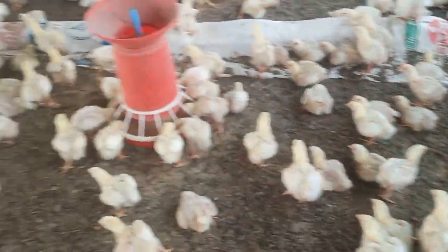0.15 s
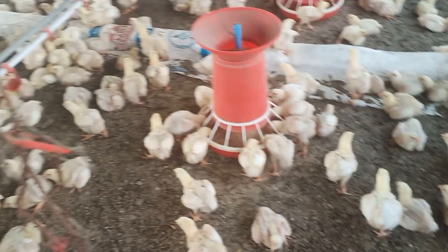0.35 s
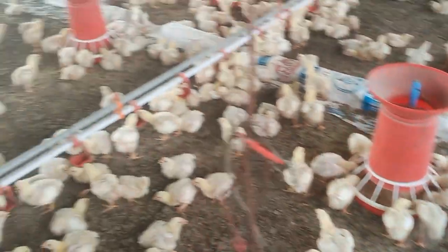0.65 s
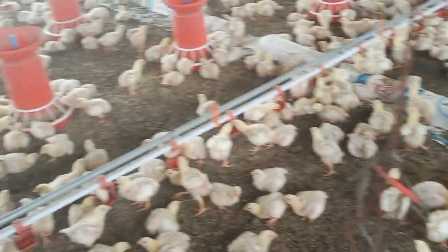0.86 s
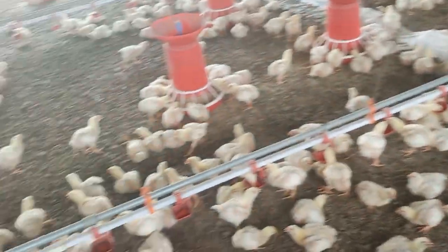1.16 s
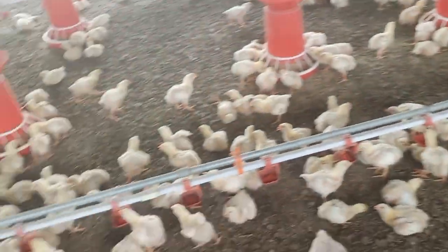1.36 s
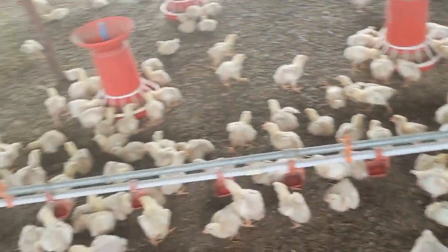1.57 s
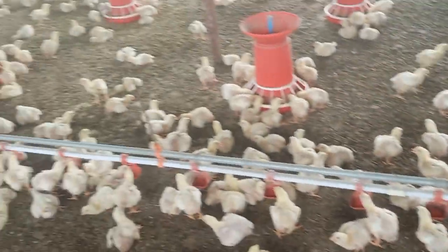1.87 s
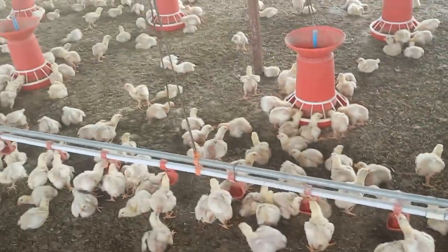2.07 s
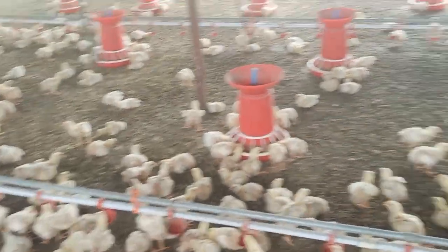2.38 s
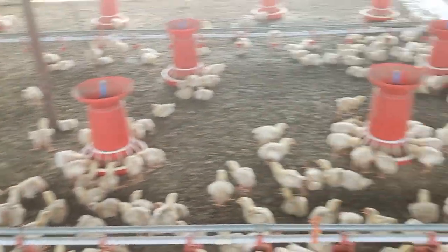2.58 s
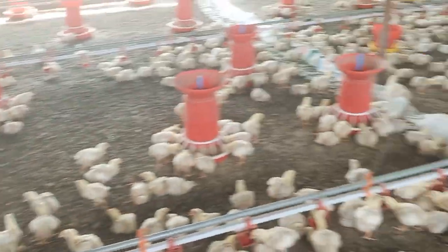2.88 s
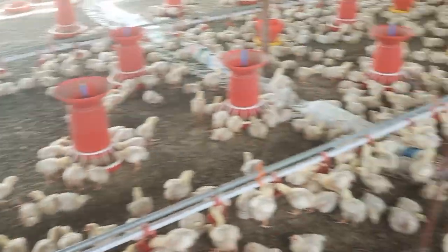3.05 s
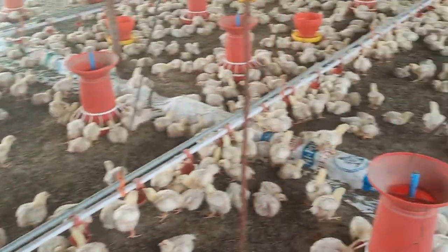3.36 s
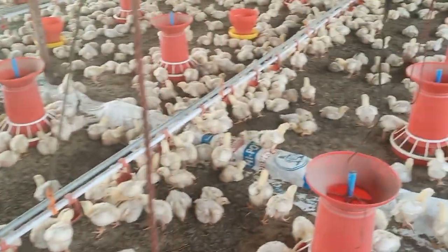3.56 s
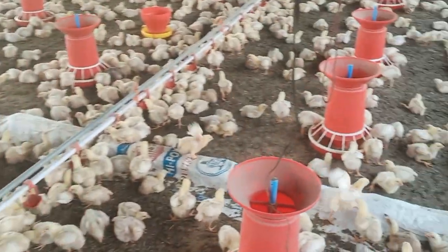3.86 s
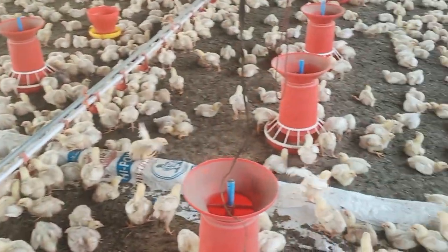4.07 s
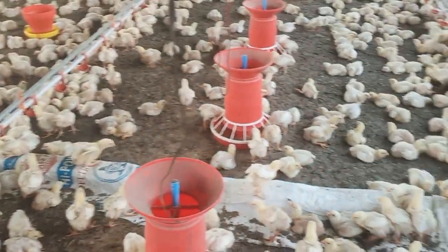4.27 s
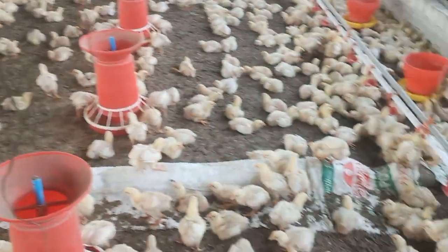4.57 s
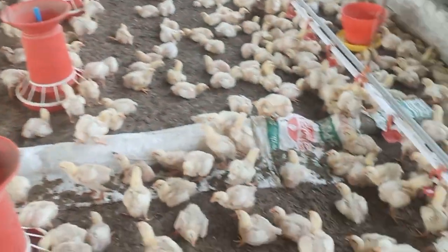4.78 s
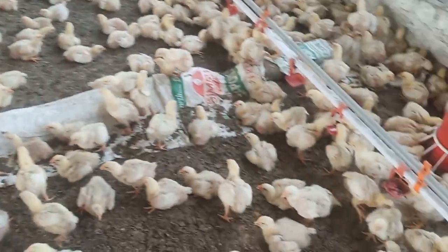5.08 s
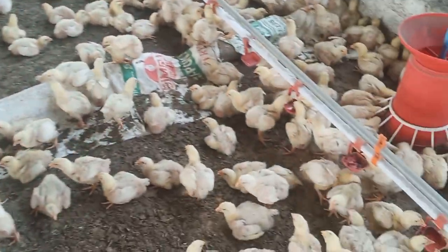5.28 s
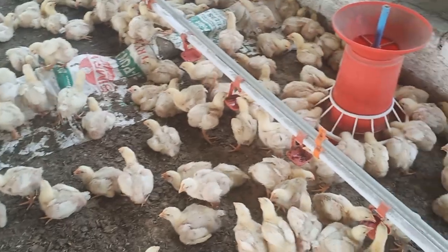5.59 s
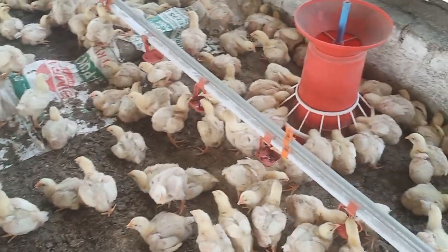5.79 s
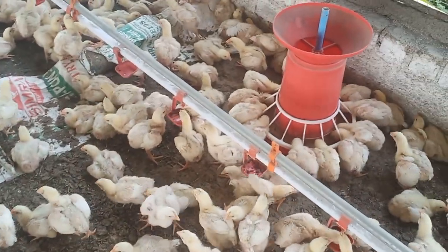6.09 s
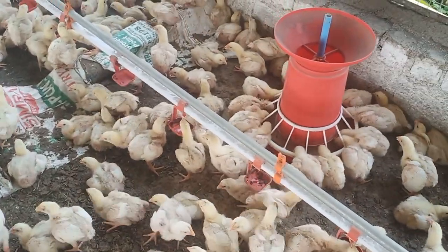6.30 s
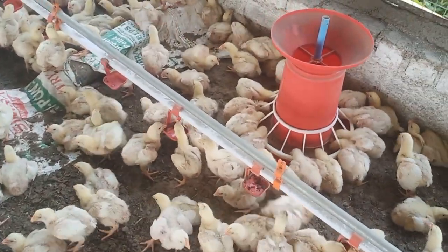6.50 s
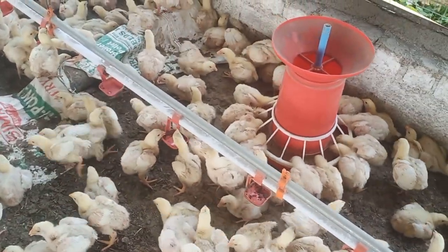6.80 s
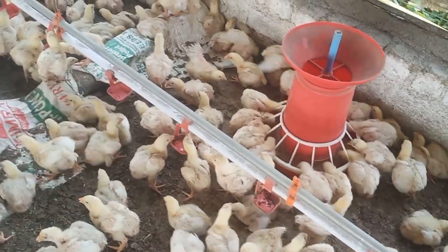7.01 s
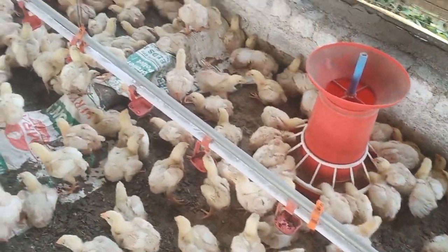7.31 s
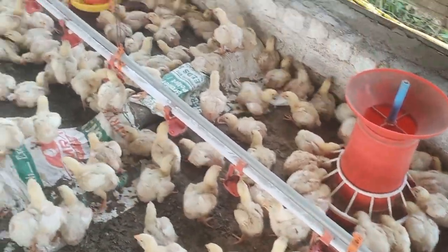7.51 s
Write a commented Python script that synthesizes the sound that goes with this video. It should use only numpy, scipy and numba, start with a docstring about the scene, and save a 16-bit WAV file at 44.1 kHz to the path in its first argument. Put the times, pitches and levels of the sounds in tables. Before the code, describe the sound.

A crowded flock of chicks cheeps without pause, nearest birds standing out sharply, over faint hiss, small beak ticks and low rustling.

```python
"""A long shed full of chicks, around a phone that pans slowly over them. The chorus opens loud and thins at once,
then runs on with brief hushes: thousands of falling sine peeps overlap with low chirrs and a few shrill calls,
and the nearest chicks stand out. Throughout, low noise swells and bright ticks of beaks on drinkers sound over a
flickering noise floor, with hiss and thin sine whine mostly left. Air rumbles and thuds left after 1.7 s, right
near 3 s; from about 4 s to 6 s the voices lean further left, then ease back a little."""
import sys
import numpy as np
from scipy import signal
from scipy.io import wavfile
from scipy.ndimage import uniform_filter1d
from numba import njit

SR = 44100
rng = np.random.default_rng(int(sys.argv[2]) if len(sys.argv) > 2 else 0)


def digitize_waveform(pressure):
    """Quantize a signal to 16-bit integers and store it at the path in sys.argv[1].

    Rows of a 2-D input are taken as channels; values are limited to [-1, 1].
    """
    field = np.atleast_2d(pressure).T
    bounded = np.clip(field, -1, 1)
    quanta = np.round(bounded * 32767).astype(np.int16)
    wavfile.write(sys.argv[1], SR, quanta)


N = 337320
T = np.arange(N) / SR


def undb(db):
    """Gain of a level in dB."""
    return 10 ** (np.asarray(db) / 20)


def level(x, db):
    """Bring x to an rms level in dB."""
    return x * undb(db) / np.sqrt(np.mean(x ** 2))


def sides(pan_db):
    """Left and right gains of constant total power, for a left minus right difference in dB."""
    left = 1 / (1 + undb(-2 * np.asarray(pan_db)))
    return np.sqrt(np.array([left, 1 - left]))


def band(x, lo_hz, hi_hz, order=2):
    """Keep the band between two frequencies."""
    return signal.sosfilt(signal.butter(order, [lo_hz, hi_hz], "bandpass", fs=SR, output="sos"), x)


def walk(rate, size=N):
    """Random levels held 1 / rate s and slewed twice; spread near 1."""
    hold = int(SR / rate)
    steps = np.repeat(rng.standard_normal(size // hold + 1), hold)
    return 2.07 * uniform_filter1d(uniform_filter1d(steps, hold), hold)[:size]


def patchy(points, lo_hz, count, per_octave, own_db, shared_db, rate, alike_hz):
    """Narrow noise bands that flicker together and alone; the ports grow more alike below alike_hz."""
    out = 0
    hz_at, db_at = np.transpose(points)
    half = 2 ** (.5 / per_octave)
    shared = shared_db * walk(rate)
    for hz in lo_hz * half ** (2 * np.arange(count)):
        mid, side = band(rng.standard_normal((2, N)), hz / half, hz * half, order=3)
        db = np.interp(np.log(hz), np.log(hz_at), db_at) + own_db * walk(rate) + shared
        width = min(hz / alike_hz, 1)
        out = out + undb(db) * (mid + width * side * np.array([[1], [-1]]))
    return level(out, 0)


@njit
def whistle(calls, gains, chance, size, shape, trill, overtone):
    """Each call is a near sine that glides with a small trill; it reaches the two ports out of step."""
    # calls: start s, length s, start Hz, end Hz, bend; chance: port step in cycles, trill rate, trill phase
    # shape: skew and sharpness of the swell; trill: lowest rate per s, pitch share, level share
    out = np.zeros((2, size))
    for c in range(len(calls)):
        start, n = int(calls[c, 0] * SR), int(calls[c, 1] * SR)
        phase, beat = 0., 2 * np.pi * (1 + chance[c, 1]) * trill[0] / SR
        for i in range(max(0, -start), min(n, size - start)):
            u = i / n
            shake = np.sin(beat * i + 2 * np.pi * chance[c, 2])
            hz = calls[c, 2] + (calls[c, 3] - calls[c, 2]) * u ** calls[c, 4]
            phase += 2 * np.pi * hz * (1 + trill[1] * shake) / SR
            swell = np.sqrt(2) * np.sin(np.pi * u ** shape[0]) ** shape[1] * (1 + trill[2] * shake)
            for ear in range(2):
                p = phase + ear * 2 * np.pi * chance[c, 0]
                out[ear, start + i] += gains[ear, c] * swell * (np.sin(p) + overtone * np.sin(2 * p))
    return out


# Colour of the hiss. Each row: frequency in Hz, relative level in dB per Hz.
HISS_COLOUR = [(9500, -17.5), (10500, -20.5), (11700, -1), (12800, -3), (14000, -7), (15200, 2.5)]
# Thin electronic tones. Each row: frequency in Hz, level in dB rms before panning and the port gain.
WHINE_TONES = [(8791, -87.5), (9873, -75.5), (12102, -87), (13184, -94.5), (14271, -76), (14330, -85.5),
               (14513, -91), (15353, -92.5), (15412, -91)]
PORT_GAIN = 2


def electronics():
    """Hiss and thin wavering tones, far stronger in the left port."""
    hiss = patchy(HISS_COLOUR, 9900, count=9, per_octave=12, own_db=1.5, shared_db=1.5, rate=14, alike_hz=100)
    hiss = hiss * undb(-72.5) * sides(13)[:, None]
    whine = 0
    for hz, db in WHINE_TONES:
        drift = 1.4 * np.array([walk(7.1), walk(3.0)])  # radians, one row a port
        loudness = np.sqrt(2) * undb(db + 2.0 * walk(70))
        whine = whine + loudness * np.sin(2 * np.pi * hz * T + drift)
    return (hiss + whine * sides(20)[:, None]) * PORT_GAIN


# Puffs of air on the ports. Each row: start in seconds, hold in seconds, level in dB, left minus right in dB.
AIR_PUFFS = [(1.734, 0.15, -47, 13), (1.925, 0.043, -61, 18), (2.056, 0.022, -62, 3),
             (2.864, 0.063, -53.5, 21), (2.965, 0.18, -41, -27), (3.227, 0.037, -57.5, 13),
             (4.421, 0.22, -60, 14), (5.81, 0.0093, -46.5, -1), (7.215, 0.042, -65, -0.5)]
PUFF_RISE_DB_PER_S, PUFF_FADE_DB_PER_S = 895, 398.5


def puffs():
    """Turbulent air at the ports: a rough low rumble that sets in fast, holds and fades."""
    common, own = rng.standard_normal(N), rng.standard_normal((2, N))
    low_noise = band(band(common + .8 * own, 70, 230), 55, 450)
    rumble = level(low_noise * undb(2.5 * walk(60)), 0)
    gain = 0
    for s, hold, db, pan_db in AIR_PUFFS:
        rise_db = PUFF_RISE_DB_PER_S * np.maximum(s - T, 0)
        fade_db = PUFF_FADE_DB_PER_S * np.maximum(T - s - hold, 0)
        gain = gain + undb(db - rise_db - fade_db) * sides(pan_db)[:, None]
    return rumble * gain


# Single eddies that buffet mostly one port. Each row: start in seconds, level in dB, left minus right in dB.
EDDIES = [(1.721, -31.5, 7), (1.747, -32, 5), (1.763, -33, 10), (1.796, -35.5, 14), (1.867, -29, 10),
          (2.946, -35, -20), (2.969, -28, -25), (2.983, -33, -27), (3.014, -45, -27), (3.055, -32.5, -29),
          (3.084, -27.5, -30), (3.117, -29, -21), (3.154, -42, -26)]
EDDY_HZ, EDDY_RISE_S = 139, 0.0043


def eddies():
    """Each eddy thuds on a port: a short low sine that swells and dies, its pitch a little random."""
    out, t = np.zeros((2, N)), np.arange(SR // 10) / SR
    swell = t / EDDY_RISE_S * np.exp(1 - t / EDDY_RISE_S)
    for (s, db, pan_db), chance in zip(EDDIES, rng.standard_normal(len(EDDIES))):
        thud = np.sin(2 * np.pi * EDDY_HZ * (1 + 0.16 * chance) * t) * swell
        out[:, int(s * SR):][:, :len(t)] += undb(db) * sides(pan_db)[:, None] * thud
    return out


def air():
    """All the air at the ports, trimmed to its low band."""
    return band(puffs() + eddies(), 60, 700)


# Colour of the low noise floor. Each row: frequency in Hz, relative level in dB per Hz.
LOW_FLOOR_COLOUR = [(24, -42), (40, -9.5), (123, -2.5), (230, -8), (338, -4.5), (550, -3), (869, -7.5),
                    (1100, 8.5), (1430, -30), (2420, -120)]
# Colour of the high noise floor. Each row: frequency in Hz, relative level in dB per Hz.
HIGH_FLOOR_COLOUR = [(3600, 4.5), (4400, -26.5), (5200, -11.5), (6200, -22), (7200, -27.5), (9000, -35)]


def patchy_floor():
    """Low patchy noise floor that flickers in narrow bands, and a high one that leans left."""
    low = patchy(LOW_FLOOR_COLOUR, 42, count=24, per_octave=5, own_db=3.2, shared_db=1.6, rate=13, alike_hz=3000)
    high = patchy(HIGH_FLOOR_COLOUR, 3700, count=10, per_octave=7, own_db=4, shared_db=1.5, rate=30, alike_hz=100)
    return low * undb(-60.5) + high * undb(-58.5) * sides(8.1)[:, None]


# Short swells of low noise. Each row: start in seconds, relative level in dB, colour in Hz.
NOISE_SWELLS = [(0.027, -33, 740), (0.227, -39.5, 332), (0.689, -35, 820), (0.732, -36.5, 330),
                (1.053, -39.5, 720), (1.157, -33.5, 432), (1.862, -46, 573), (1.89, -39, 544),
                (1.935, -44, 560), (2.056, -39.5, 576), (2.27, -39.5, 640), (2.398, -41, 583),
                (2.577, -41, 940), (2.75, -41, 557), (2.902, -34.5, 514), (2.974, -31.5, 303),
                (3.062, -45, 245), (3.4, -49.5, 690), (3.606, -42.5, 700), (3.666, -37.5, 315),
                (3.718, -36.5, 627), (3.872, -36, 263), (3.96, -35.5, 850), (4.031, -36, 785),
                (4.206, -35.5, 390), (4.402, -39, 966), (4.565, -38, 754), (4.61, -43, 390),
                (4.934, -30, 916), (4.968, -39.5, 403), (5.07, -35.5, 980), (5.18, -32.5, 960),
                (5.409, -50, 317), (5.526, -44.5, 240), (5.745, -35.5, 770), (5.821, -33.5, 605),
                (5.832, -38.5, 299), (6, -45, 347), (6.13, -41.5, 634), (6.168, -41.5, 347),
                (6.19, -29.5, 776), (6.24, -41, 393), (6.245, -36, 910), (6.724, -28, 590),
                (6.745, -47, 310), (6.836, -40, 332), (6.899, -39, 472), (6.915, -46, 318),
                (7.037, -36.5, 586), (7.08, -47, 420), (7.551, -46.5, 344)]
SWELL_RISE_S, SWELL_TRIM_DB = .021, -11.5
SWELL_SKIRT_DB = -5  # broad grit around the colour of a swell


def noise_swells():
    """Short swells of low gritty noise, each with its own colour."""
    out, t = np.zeros((2, N + SR)), np.arange(SR // 4) / SR
    swell = (t / SWELL_RISE_S * np.exp(1 - t / SWELL_RISE_S)) ** 2
    swell = sides(-1)[:, None] * swell
    for s, db, hz in NOISE_SWELLS:
        common, own = rng.standard_normal(len(t)), rng.standard_normal((2, len(t)))
        noise = common + 0.53 * own
        core = level(band(noise, hz / 1.182, hz * 1.173), 0)
        skirt = level(band(noise, hz / 2, hz * 2.1), SWELL_SKIRT_DB)
        out[:, int(s * SR):][:, :len(t)] += (core + skirt) * undb(db + SWELL_TRIM_DB) * swell
    return out[:, :N]


# Beaks on drinkers and feeders. Each row: start in seconds, relative level in dB.
BEAK_TICKS = [(.391, -82), (.7098, -64), (.841, -59), (1.6282, -60), (1.894, -59), (2.1101, -56),
              (2.2374, -66), (2.352, -59), (2.5775, -66.5), (2.676, -62.5), (2.7866, -63), (3.1425, -57),
              (3.285, -55), (3.6316, -60), (3.821, -61.5), (3.914, -54.5), (4.447, -63), (5.3, -61),
              (5.3911, -62), (5.738, -52.5), (6.208, -54), (6.3215, -64), (6.4408, -66), (6.526, -59),
              (6.7231, -62), (6.9675, -56), (7.0664, -57)]
FAINT_TICK_DB, TICK_TRIM_DB, TICK_PAN_DB = -66, 7.0, 14.5
TICK_RATTLE = 0.62  # usual share of rattle against click


def ticks():
    """A click, then a gritty rattle of the drinker, bright through the port's high resonance; faint ones between."""
    out, t = np.zeros((2, N + SR)), np.arange(SR // 8) / SR
    faint = [(s * N / SR, FAINT_TICK_DB + 8.0 * (size - .5)) for s, size in rng.random((35, 2))]
    for s, db in BEAK_TICKS + faint:
        share = np.clip(TICK_RATTLE + .15 * rng.standard_normal(), 0, 1)
        slow = 0.011 * (0.53 + rng.random())  # rise of the rattle in s
        click = t / 0.003 * np.exp(1 - t / .002)
        rattle = t / slow * np.exp(1 - t / slow)
        shape = (1 - share) * click + share * rattle
        flicker = undb(4.6 * walk(300, size=len(t)))
        grit = band(rng.standard_normal((2, len(t))) * shape * flicker, 10800, 14500)
        out[:, int(s * SR):][:, :len(t)] += undb(db + TICK_TRIM_DB) * sides(TICK_PAN_DB)[:, None] * grit
    return out[:, :N]


# The phone swings round. Each row: time in seconds, left minus right in dB.
PHONE_TURN = [(0.0, 7.5), (1.4, 6.5), (1.64, 7), (2.83, 7), (3.24, 6), (3.75, 7), (6.05, 11), (7.65, 9)]
LEAN_DB_PER_OCTAVE, LEFT_PEAK_HZ = 15, 3200  # the left port favours pitches near this one


def pan_of(s, hz):
    """Left minus right dB of a call: where the phone points, and the colour of the left port."""
    octaves_off = np.minimum(abs(np.log2(hz / LEFT_PEAK_HZ)), 1.05)
    return np.interp(s, *np.transpose(PHONE_TURN)) + LEAN_DB_PER_OCTAVE * (.3 - octaves_off)


# Loudness of the flock. Each row: time in seconds, level of all voices in dB, extra level of low chirrs in dB.
FLOCK_LOUDNESS = [(0, -21.5, 4), (.2, -30, 0.5), (.75, -32, 4.5), (1.2, -30.5, -4.5), (1.5, -32.5, 0),
                  (1.9, -31.5, 1), (2.25, -31, -4), (2.6, -32.5, -6.5), (3.1, -30.5, -3), (3.4, -29, -2),
                  (3.85, -29.5, 2.5), (4.35, -30.5, 1.5), (4.9, -31, 1), (5.7, -29.5, -0.5), (6.2, -31, 2),
                  (6.7, -28, -1), (7.1, -31, 6), (7.35, -29.5, -4), (7.65, -32, -5)]
# Brief hushes of the flock. Each row: middle in seconds, half width in seconds, depth in dB before a voice's share.
HUSHES = [(.07, 0.038, 8.5), (0.459, 0.034, 11.5), (1.098, 0.02, 7), (1.479, 0.068, 6),
          (2.019, 0.058, 11.5), (2.342, 0.063, 13), (2.811, 0.067, 7.5), (3.482, 0.11, 9.5),
          (3.699, 0.076, 11.5), (4.149, 0.076, 1.5), (4.469, 0.041, 4), (4.86, 0.099, 4.5), (5.45, 0.14, 4),
          (6.302, 0.02, 12), (7.179, 0.042, 5.5), (7.39, 0.015, 0.5)]
# Peeps, low chirrs, shrill calls, deep peeps. Each row: calls a second, middle pitch in Hz, pitch spread as a share,
# typical fall as a share, typical length in seconds, gain in dB, share of a hush, own waver in dB.
FLOCK_VOICES = [(349.6, 2561, .118, 0.1637, 0.034, -0.52, 0.57, 1.06),
                (99.3, 1320, 0.075, .086, 0.034, -16.5, 1.6, 2.2),
                (130, 4050, .095, 0.046, 0.045, -29, 3, 1.2), (87, 1780, 0.065, 0.16, 0.041, -24, 0.93, 2)]
CHIRR_BELOW_HZ, WAVERS_PER_S = 1500, 6.5
SPAN_S, MOST_CALLS = 8, 4000


def flock():
    """Four kinds of voice scattered in time, pitch, distance and direction; a peep holds, then drops."""
    times, all_db, low_db = np.transpose(FLOCK_LOUDNESS)
    loud_db, chirr_db = np.interp(T, times, all_db), np.interp(T, times, low_db)
    hush_db = sum(depth_db * np.exp(-((T - s) / half) ** 2) for s, half, depth_db in HUSHES)
    out = 0
    for rate, hz, spread, fall, length, gain_db, hush, waver_db in FLOCK_VOICES:
        count = int(rate * SPAN_S)
        even = rng.random((MOST_CALLS, 5))[:count]
        bell = rng.standard_normal((MOST_CALLS, 5))[:count]
        middle = hz * np.exp(spread * np.clip(bell[:, 0], -2, 1.7))
        drop = fall * np.exp(0.7234 * np.clip(bell[:, 1], -2, 1.0))
        start = SPAN_S * even[:, 0] - .01
        lengths = length * np.exp(.35 * bell[:, 2])
        bend = 1 + even[:, 4]
        calls = np.c_[start, lengths, middle * (1 + .4 * drop), middle * (1 - .6 * drop), bend]
        gains = undb(3 * bell[:, 3]) * sides(pan_of(start, middle) + 4.9 * bell[:, 4])
        shape, trill = np.array([.8, 1.6]), np.array([40, .013, .3])
        crowd = whistle(calls, gains, even[:, 1:4].copy(), N, shape, trill, undb(-52.5))
        swing_db = loud_db + chirr_db * (hz < CHIRR_BELOW_HZ) - hush * hush_db + waver_db * walk(WAVERS_PER_S)
        out = out + level(crowd, gain_db) * undb(swing_db)
    return out


# Calls of the nearest chicks. Each row: start in seconds, length in seconds, start pitch in Hz, end pitch in Hz,
# level in dB, left minus right in dB.
NEAR_CALLS = [(0.009, 0.028, 1850, 1750, -36.5, 5), (0.048, 0.063, 2130, 1780, -33, 1.5),
              (0.14, 0.096, 1180, 1312, -37, -2.5), (0.142, 0.029, 1710, 1700, -40.5, -20),
              (0.152, 0.033, 2190, 1940, -19, 3), (0.167, 0.13, 2430, 1720, -32, -12),
              (0.183, 0.076, 3950, 3780, -50, 9), (0.186, 0.033, 2630, 2680, -33.5, 5),
              (0.202, 0.041, 2080, 1740, -28, -8), (0.287, 0.067, 1440, 1346, -34, -7),
              (0.371, 0.036, 1357, 1356, -36, -3), (0.375, 0.024, 3500, 3330, -37, 16),
              (0.4, 0.039, 2630, 2380, -26, 10), (0.439, 0.096, 3020, 2454, -25.5, 2.5),
              (0.481, 0.028, 2150, 1470, -26, -16), (0.497, 0.047, 2194, 1946, -23.5, 4.5),
              (0.551, 0.053, 1379, 1320, -36, 0.5), (0.586, 0.033, 2414, 2460, -21.5, 8),
              (0.587, 0.069, 1384, 1017, -33, 4), (0.607, 0.071, 1535, 1670, -38, -9),
              (0.682, 0.082, 1092, 1210, -34, 1), (0.733, 0.1, 3540, 2590, -39.5, 3),
              (0.739, 0.033, 3950, 3800, -54, -5), (0.74, 0.032, 2530, 2750, -21, 5),
              (0.75, 0.012, 1374, 1360, -26.5, -3), (0.753, 0.04, 2150, 2300, -29, 2),
              (0.763, 0.042, 1970, 1830, -29, -8), (0.798, 0.05, 2340, 1354, -26.5, -5),
              (0.836, 0.054, 1960, 1940, -33, -8), (0.849, 0.094, 2120, 1990, -37.5, 4),
              (0.948, 0.068, 1316, 1434, -34.5, 1), (0.984, 0.067, 4070, 4000, -50.5, 8),
              (0.985, 0.031, 1670, 1770, -37, -7), (1.114, 0.053, 5230, 5100, -58, 14),
              (1.161, 0.041, 1800, 1550, -26, -7), (1.209, 0.022, 3550, 3440, -47, 0),
              (1.214, 0.024, 1730, 1690, -36, -11), (1.233, 0.03, 2220, 2065, -23, 5),
              (1.311, 0.035, 1430, 1410, -34.5, -5), (1.643, 0.068, 2010, 1950, -30.5, 4),
              (1.667, 0.081, 3040, 2710, -28, 8), (1.694, 0.038, 2044, 2044, -25, 7),
              (1.77, 0.04, 714, 700, -45.5, -5), (1.771, 0.034, 2324, 2010, -29.5, -10),
              (1.81, 0.098, 1710, 1820, -41.5, -4), (1.888, 0.029, 5420, 5430, -54, 18),
              (2.058, 0.033, 1467, 1364, -34, -6), (2.135, 0.042, 3200, 2930, -32, 15),
              (2.145, 0.026, 2320, 2070, -26, 0), (2.142, 0.03, 3970, 3720, -41, 8),
              (2.22, 0.055, 2310, 1957, -24.5, -1), (2.532, 0.039, 3110, 2820, -28, 11),
              (2.562, 0.067, 2485, 2170, -22, 4), (2.572, 0.037, 3720, 3290, -45, 15),
              (2.614, 0.049, 2870, 2700, -22.5, 7), (2.661, 0.042, 3300, 3000, -27.5, 11),
              (2.679, 0.025, 1900, 2000, -34.5, -16), (2.685, 0.028, 2680, 2305, -16.5, -1.5),
              (2.882, 0.061, 2420, 2170, -29, 3), (2.946, 0.043, 1920, 1730, -34.5, -2),
              (2.95, 0.027, 3120, 2760, -24.5, 9), (2.993, 0.082, 3270, 3120, -33, 10),
              (3.032, 0.039, 2850, 2340, -29, 5), (3.117, 0.056, 3400, 3330, -33, 14),
              (3.175, 0.021, 1446, 1330, -30.5, -4.5), (3.175, 0.092, 3217, 2306, -22.5, 16),
              (3.207, 0.027, 2230, 1760, -24.5, -0.5), (3.208, 0.036, 700, 700, -48, 2),
              (3.236, 0.027, 2410, 2350, -28.5, 15), (3.239, 0.075, 4600, 4680, -56.5, 20),
              (3.252, 0.07, 722, 726, -54.5, 0), (3.29, 0.088, 3504, 3130, -29, 16),
              (3.299, 0.094, 2820, 1910, -36, 7), (3.306, 0.094, 732, 710, -60, 8),
              (3.391, 0.05, 3270, 3170, -27.5, 15), (3.412, 0.03, 3100, 2530, -32, 6),
              (3.428, 0.032, 2650, 2324, -21.5, 6), (3.613, 0.026, 2405, 2380, -28, 2),
              (3.797, 0.054, 2590, 2550, -27.5, -1), (3.834, 0.041, 3800, 3760, -44.5, -1),
              (3.878, 0.035, 1890, 1820, -38.5, -1), (3.933, 0.052, 2900, 2700, -26, 5),
              (3.995, 0.067, 1810, 1345, -36, -10), (4.327, 0.051, 1480, 1274, -35, -13),
              (4.329, 0.038, 2200, 1690, -25.5, -9), (4.341, 0.049, 3620, 3720, -41.5, 13),
              (4.353, 0.074, 2420, 2260, -27.5, 8), (4.36, 0.052, 4840, 4900, -51.5, 18),
              (4.453, 0.079, 2520, 2000, -37.5, -10), (4.462, 0.052, 3050, 2630, -28, 15),
              (4.49, 0.021, 2574, 2290, -21.5, 10), (4.506, 0.064, 5380, 4970, -53, 16),
              (4.526, 0.063, 4130, 3600, -36.5, 6), (4.551, 0.034, 2265, 1750, -33, 5),
              (4.559, 0.058, 5220, 5180, -54, 20), (4.629, 0.022, 1790, 1610, -37, -8),
              (4.729, 0.063, 3630, 3570, -40.5, 12), (4.753, 0.064, 2300, 2200, -29, -8),
              (4.764, 0.044, 4500, 4400, -40, 4), (4.765, 0.076, 3380, 3230, -35.5, 17),
              (4.772, 0.041, 5400, 5370, -59.5, 13), (4.873, 0.041, 2665, 2370, -21, 9),
              (4.899, 0.049, 4120, 4060, -42, 7), (4.914, 0.03, 1030, 945, -46, -3),
              (4.931, 0.095, 3150, 2800, -29, 16), (4.952, 0.098, 1021, 920, -40.5, -1),
              (4.985, 0.02, 4730, 4700, -54, 13), (5.014, 0.021, 2595, 2560, -20.5, 8),
              (5.041, 0.096, 949, 880, -37.5, -4), (5.067, 0.066, 2503, 2232, -26.5, -7),
              (5.156, 0.074, 1990, 1630, -40, -14), (5.165, 0.042, 1310, 1287, -31.5, -3),
              (5.23, 0.071, 2560, 2260, -26, 3), (5.277, 0.035, 1204, 1170, -33, 6),
              (5.278, 0.059, 3240, 2940, -29, 12), (5.303, 0.096, 2360, 1876, -41, -1),
              (5.369, 0.026, 1420, 1360, -34.5, 1), (5.485, 0.099, 2900, 2580, -30, 5),
              (5.576, 0.056, 2400, 2117, -30, -1), (5.588, 0.037, 1435, 1360, -27, -11),
              (5.637, 0.088, 3137, 2930, -28.5, 19), (5.656, 0.1, 1297, 1130, -37.5, -2),
              (5.726, 0.033, 842, 877, -44, 3), (5.744, 0.06, 1320, 1365, -39.5, -2),
              (5.798, 0.1, 2990, 2550, -30, 9), (5.836, 0.062, 4070, 3070, -46.5, 10),
              (5.87, 0.026, 2767, 2820, -31, 18), (5.892, 0.07, 1476, 1390, -34, -21),
              (5.969, 0.07, 3140, 2650, -26.5, 13), (6.03, 0.11, 2530, 2003, -24.5, 6),
              (6.031, 0.11, 1472, 1284, -30.5, -6), (6.057, 0.04, 1920, 1910, -34.5, -6),
              (6.099, 0.056, 4000, 3980, -47.5, 4), (6.12, 0.025, 3630, 3750, -44.5, 21),
              (6.178, 0.07, 2546, 1650, -32, 0), (6.208, 0.02, 1640, 1530, -33.5, -15),
              (6.283, 0.082, 3136, 2660, -26, 17), (6.366, 0.076, 3160, 3040, -31, 24),
              (6.377, 0.035, 716, 696, -41.5, 3), (6.382, 0.059, 3550, 3490, -39, 10),
              (6.409, 0.026, 2390, 2390, -32, 2), (6.44, 0.023, 2880, 2710, -22, 13.5),
              (6.442, 0.03, 3320, 3070, -34, 13), (6.471, 0.066, 2460, 2050, -30, 2),
              (6.485, 0.037, 3070, 2700, -26, 11), (6.522, 0.031, 2016, 1890, -38, -1),
              (6.552, 0.074, 3100, 2820, -23.5, 22), (6.565, 0.022, 2740, 2560, -23, 13),
              (6.565, 0.068, 3760, 3950, -46, 12), (6.603, 0.076, 3330, 2880, -31, 15),
              (6.618, 0.08, 5010, 4910, -55, 5), (6.658, 0.052, 2070, 1980, -33.5, -5),
              (6.662, 0.06, 2555, 2400, -26, -4), (6.676, 0.069, 1260, 940, -39.5, -3),
              (6.677, 0.043, 3110, 3040, -39, 17.5), (6.724, 0.053, 1870, 1550, -34, -8),
              (6.735, 0.051, 2730, 2370, -26.5, 12), (6.748, 0.025, 2930, 2860, -24, 19.5),
              (6.789, 0.12, 2987, 3070, -31.5, 10), (6.792, 0.068, 3690, 3530, -40.5, 8),
              (6.812, 0.085, 2397, 2150, -27.5, -3), (6.823, 0.048, 4060, 3980, -47.5, 6),
              (6.848, 0.04, 5330, 5260, -55, 17), (6.91, 0.042, 2750, 2797, -23.5, 15),
              (6.93, 0.041, 2540, 2320, -23, -1), (6.947, 0.058, 3550, 3480, -41, 11),
              (6.955, 0.023, 3870, 4050, -35.5, 2), (7.025, 0.034, 1433, 1280, -31.5, 5),
              (7.048, 0.12, 2346, 2070, -28, -1), (7.075, 0.059, 5410, 5490, -57.5, 14),
              (7.152, 0.038, 3570, 3350, -43.5, 11), (7.181, 0.05, 3390, 3260, -37, 13),
              (7.212, 0.035, 4010, 3760, -33.5, 2), (7.213, 0.034, 3020, 2760, -27, 15),
              (7.253, 0.12, 2716, 2500, -23.5, 5.5), (7.255, 0.027, 3580, 3560, -40.5, 16),
              (7.263, 0.11, 4050, 4040, -51.5, 10), (7.279, 0.031, 2410, 2260, -20.5, 7),
              (7.28, 0.035, 3100, 2840, -24, 15), (7.286, 0.063, 3220, 3540, -34, 12),
              (7.313, 0.02, 1980, 1880, -29, -10), (7.318, 0.038, 1654, 1320, -33, -3),
              (7.33, 0.016, 2803, 2550, -19.5, 10), (7.335, 0.077, 2290, 2320, -36, 0),
              (7.398, 0.073, 1454, 1364, -33.5, -8.5), (7.399, 0.016, 1870, 1890, -39, -15),
              (7.48, 0.083, 3020, 2556, -25.5, 14), (7.482, 0.055, 1470, 1440, -31.5, -10),
              (7.503, 0.051, 3480, 2740, -34, 18), (7.536, 0.031, 5870, 5800, -56.5, 16),
              (7.541, 0.041, 1417, 1426, -37, 0), (7.55, 0.035, 3820, 3770, -36.5, 6),
              (7.58, 0.034, 1408, 1245, -32, 4.5), (7.623, 0.015, 2750, 2590, -24, 9)]
NEAR_BEND = 1.8  # above 1 a call holds its pitch, then glides
SHRILL_ABOVE_HZ = 3500


def near_chicks():
    """The calls that stand out of the chorus: slightly trembling glides; the shrill ones warble roughly."""
    rows = np.array(NEAR_CALLS, float)
    chance = rng.random((len(rows), 4))
    port_step = np.sign(chance[:, 3] - .5) * (.13 + .24 * chance[:, 0])  # cycles
    steps = np.c_[port_step, chance[:, 1:3]]
    gains = undb(rows[:, 4]) * sides(rows[:, 5])
    calls = np.c_[rows[:, :4], np.full(len(rows), NEAR_BEND)]
    shrill = rows[:, 2] > SHRILL_ABOVE_HZ
    shape = np.array([.9, .8])
    tremble, warble = np.array([40, .004, .18]), np.array([55, .018, .65])
    plain_calls = whistle(calls, gains * ~shrill, steps, N, shape, tremble, undb(-46))
    shrill_calls = whistle(calls, gains * shrill, steps, N, shape, warble, undb(-46))
    return plain_calls + shrill_calls


SHED_T60_S = .22
FLOCK_WET_DB, NEAR_WET_DB = -3, -11


def shed(x, wet_db):
    """Floor, roof and walls return a short diffuse tail, more of it to the right port."""
    t = np.arange(int(SR / 2)) / SR
    tail = rng.standard_normal((2, len(t))) * 1000. ** (-t / SHED_T60_S) * (t > .004)
    tail = tail / np.sqrt(np.sum(tail ** 2, axis=1, keepdims=True))
    tail = tail * undb(wet_db + np.array([[-1.5], [1.5]]))
    return x + signal.fftconvolve(x, tail, axes=1)[:, :N]


def scene():
    """Port noise, air, patchy noise floor, noise swells and ticks stay dry; the voices ring in the shed."""
    background = electronics() + air() + patchy_floor() + noise_swells() + ticks()
    return background + shed(flock(), FLOCK_WET_DB) + shed(near_chicks(), NEAR_WET_DB)


def record(dry):
    """The phone cuts the top, steeply above 15.7 kHz."""
    return signal.sosfilt(signal.ellip(12, .2, 85, 15700, fs=SR, output="sos"), dry)


dry = scene()
out = record(dry)
digitize_waveform(out)
```